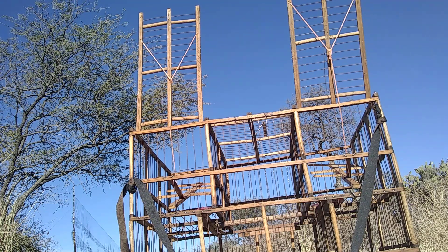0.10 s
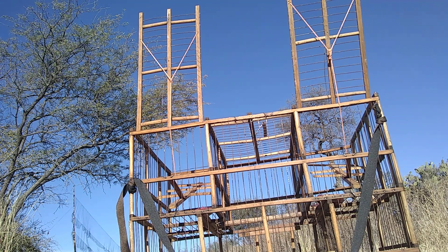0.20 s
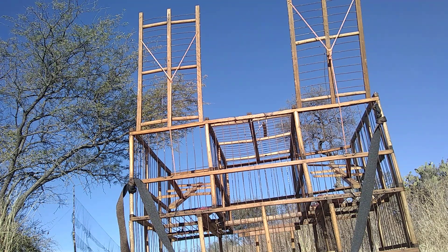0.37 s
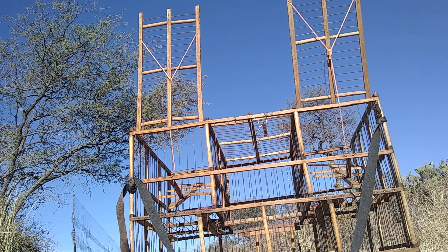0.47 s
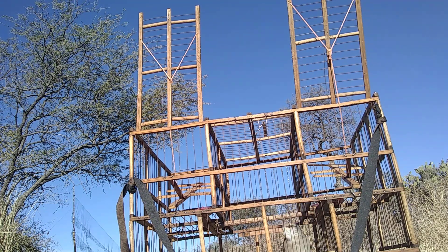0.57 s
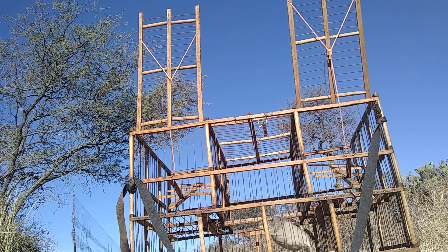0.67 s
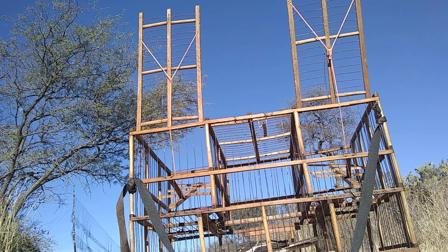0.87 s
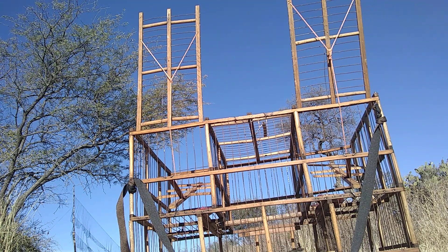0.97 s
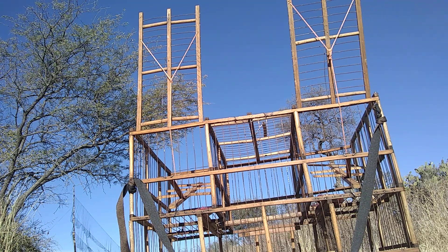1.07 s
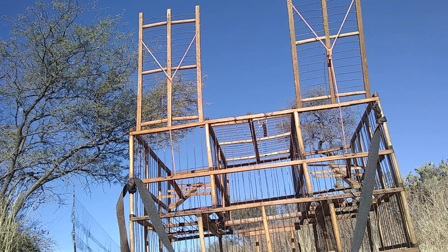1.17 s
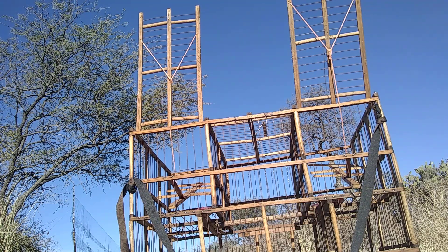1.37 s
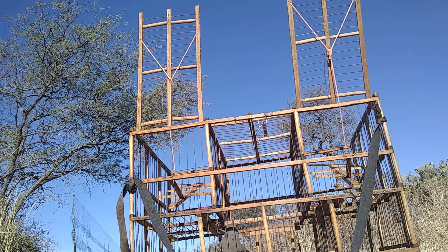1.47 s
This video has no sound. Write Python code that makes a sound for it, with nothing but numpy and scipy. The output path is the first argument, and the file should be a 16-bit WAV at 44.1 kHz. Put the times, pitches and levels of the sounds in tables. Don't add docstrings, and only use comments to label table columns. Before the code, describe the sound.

Songbird in a slatted cage outdoors: brief beating whistle, tiny gap, fast liquid trill dropping in pitch and slowing, repeated four times without pause. Clear and fairly dry, slight scattered echo, very quiet air hiss, drifting left to right.

```python
import sys
import numpy as np
from scipy import signal
from scipy.fft import rfft, irfft
from scipy.io import wavfile
from scipy.ndimage import uniform_filter1d, map_coordinates

SR = 44100
rng = np.random.default_rng(int(sys.argv[2]) if len(sys.argv) > 2 else 0)


def master_out(mix):
    frames = np.transpose(np.atleast_2d(mix))
    ceiling = np.clip(frames, -1, 1)
    pcm = np.round(ceiling * 32767).astype(np.int16)
    wavfile.write(sys.argv[1], SR, pcm)


def linear_from_db(decibels):
    return 10 ** (np.asarray(decibels, float) / 20)


N = 68355

# (start [s], length [s], level [dB], second voice [dB], share of the note that voice lasts [0-1])
WHISTLES = [
    (0.178, 0.062, -22, -9.5, 0.4),
    (0.444, 0.056, -17.5, -8, 1),
    (0.734, 0.064, -22.5, -3, 0.93),
    (1.061, 0.066, -23, -4.5, 0.58),
]
# (octave [dB], third harmonic [dB], late octave change [dB], opening puff [dB], closing puff [dB])
COLOURS = [
    (0, 7.5, -2, 4.5, -3.5),
    (0, 2, -3, 1.5, 5.5),
    (0, -2, 3, 0, -2),
    (3, -4, -8.5, -4.5, 1.5),
]


def evened(x):
    return x / np.sqrt(np.mean(x ** 2) + 1e-20)


def smooth_noise(size):
    return evened(uniform_filter1d(rng.standard_normal(N), size=size))


def coloured(points, count):
    f, db = np.transpose(points)
    shape = linear_from_db(np.interp(np.log(np.fft.rfftfreq(N, 1 / SR) + 1), np.log(f), db))
    return evened(irfft(rfft(rng.standard_normal((count, N))) * shape, N))


def eased(t, knots, values):
    place = np.interp(t, knots, np.arange(len(knots)))
    k = np.minimum(place.astype(int), len(knots) - 2)
    return values[k] + (values[k + 1] - values[k]) * (.5 - .5 * np.cos(np.pi * (place - k)))


def whistle(t, start, length, level_db, second_db, share, pitch, skew, colour):
    second_up_hz, voice_rough, octave_rough = 272, .1, .8
    octave_db, third_db, late_octave_db = colour[:3]
    u = np.clip((t - start) / length, 0, 1)
    spent = np.clip(u / share, 0, 1) ** 2
    swell = linear_from_db(level_db) * np.sin(np.pi * u ** skew).clip(0) ** 0.97
    second = linear_from_db(second_db) * np.sqrt(np.cos(np.pi / 2 * spent).clip(0))

    hz = uniform_filter1d(np.interp(t, *np.transpose(pitch)), size=300)
    drift = 1 + 0.061 * smooth_noise(500)
    rough = uniform_filter1d(rng.standard_normal((2, N)), size=50)
    hoarse, shaky = evened(uniform_filter1d(rough, size=40))
    low = 2 * np.pi * np.cumsum(hz) / SR
    beat = 2 * np.pi * np.cumsum(second_up_hz * drift) / SR

    tone = (1 + voice_rough * shaky) * np.cos(low)
    tone += linear_from_db(-36.5 + third_db) * np.cos(3 * low + hoarse)
    below, above = linear_from_db(-24.5) * np.cos(low - beat), linear_from_db(-14.5) * np.cos(low + 2 * beat)
    tone += second * (np.cos(low + beat) + below + above)

    octave = linear_from_db(-30 + 8.5 * spent) * np.cos(2 * low)
    octave += second * linear_from_db(-25.5) * (np.cos(2 * low + beat) + .5 * np.cos(2 * low + 2 * beat))
    octave *= linear_from_db(octave_db + late_octave_db * np.clip((u - .6) / .2, 0, 1))
    octave *= 1 + octave_rough * hoarse * second
    return swell * (tone + octave), swell


def whistles(t):
    # (time [s], frequency [Hz])
    whistle_hz = [
        [(.18, 1827), (.21, 1791), (.228, 1865), (.238, 1846)],
        [(.445, 1768), (.462, 1823), (.5, 1747)],
        [(.736, 1750), (.755, 1820), (.783, 1733), (.796, 1844)],
        [(1.062, 1754), (1.086, 1855), (1.104, 1761), (1.124, 1875)],
    ]
    skews = [
        1.2,
        1.11,
        0.83,
        0.95,
    ]
    rows = zip(WHISTLES, whistle_hz, skews, COLOURS)
    return np.sum([whistle(t, *row, *more) for row, *more in rows], 0)


def warble(t, notes, effort, lead_in):
    # (time [s], level [dB])
    octave_by_phrase = [
        (.3, 1.5),
        (.6, -2),
        (.9, -6.5),
        (1.22, 2),
    ]
    flick_s, break_s, end_s = .002, 0.0019, .004
    throat_hz, throat_width_hz, knee_hz = 2778, 740, 2645
    top_s, top_hz, low_hz, ahead_ms, slide_ms = np.transpose(notes)
    ahead, slide = ahead_ms * 1e-3, slide_ms * 1e-3
    level_db, break_db = np.transpose(effort)
    lead_s, lead_hz, lead_db = lead_in

    before = np.r_[low_hz[0], low_hz[:-1]]
    shoulder = before + (.72 + .016 * break_db.clip(0, 30)) * (top_hz - before)
    bend = top_hz - .4 * (top_hz - low_hz)
    flick = top_s - ahead
    begin, end = top_s[0] - lead_s, top_s[-1]
    times = np.c_[flick - flick_s, flick, top_s, top_s + slide / 2, top_s + slide]
    knots = np.r_[begin, times.ravel()]
    pitch = np.r_[lead_hz, np.c_[before, shoulder, top_hz, bend, low_hz].ravel()]
    hz = uniform_filter1d(np.interp(t, np.maximum.accumulate(knots), pitch), size=50)

    db = eased(t, np.r_[begin, top_s + .6 * slide], np.r_[lead_db, level_db])
    glide = uniform_filter1d(np.gradient(hz), size=60) * SR
    db -= 2 * np.tanh(glide / 170000.0)
    db -= 19.5 * (knee_hz - hz).clip(0) / 1e3
    hz = hz * (1 + .003 * smooth_noise(50))
    from_break = (t - (flick - flick_s / 2)[:, None]) / break_s
    db -= (break_db[:, None] * np.exp(-from_break ** 2)).sum(0)
    on = np.clip((t - begin) / end_s, 0, 1) * np.clip(1 - (t - end) / end_s, 0, 1)
    swell = on * linear_from_db(db - 5 * ((hz - throat_hz) / throat_width_hz) ** 2)

    beak_db = np.interp(t, *np.transpose(octave_by_phrase))
    octave = linear_from_db(-38 + beak_db - 14.5 * (hz - throat_hz) / 1e3)
    octave *= 1 + smooth_noise(60)
    turn = 2 * np.pi * np.cumsum(hz) / SR
    tone = np.cos(turn) + octave * np.cos(2 * turn) + linear_from_db(-53) * np.cos(3 * turn)
    return swell * tone, swell


def warbles(t):
    # (top [s], top [Hz], bottom after it [Hz], flick before the top [ms], slide after it [ms])
    warble_1 = [(.2495, 3120, 2830, 2, 3), (.2563, 3620, 2950, 2, 3.5), (.2646, 3760, 2830, 2.5, 6),
                (.2768, 3520, 2540, 3, 8), (.295, 3490, 2380, 5, 6.5), (.3164, 3320, 2400, 5, 6.5),
                (.3365, 2960, 2300, 4, 7), (.358, 2900, 2280, 4.5, 5.5), (.371, 2770, 2320, 3, 8),
                (.389, 2510, 2550, 5, 4), (.3955, 2560, 2560, 1, 2)]
    warble_2 = [(.511, 2880, 2840, 2, 3), (.517, 3500, 3050, 1.5, 3), (.523, 3680, 2970, 1.5, 4),
                (.5312, 3700, 2790, 2, 6), (.5425, 3490, 2520, 2, 9), (.5608, 3500, 2380, 3, 8),
                (.581, 3270, 2330, 4, 8), (.6006, 2960, 2300, 3, 6.5), (.621, 2810, 2230, 3, 6.5),
                (.639, 2700, 2270, 3.5, 6), (.654, 2860, 2500, 2.5, 7), (.664, 2490, 2490, 1, 2)]
    warble_3 = [(.81, 3170, 2740, 1.5, 3), (.8165, 3620, 2850, 1.2, 4), (.826, 3640, 2850, 2, 5),
                (.8365, 3570, 2550, 2, 7.5), (.8525, 3440, 2420, 2.5, 9), (.8725, 3240, 2420, 3.5, 9),
                (.892, 3170, 2300, 4, 9), (.9125, 3120, 2320, 3.5, 10), (.936, 2880, 2270, 4.5, 8),
                (.9565, 2750, 2300, 4.5, 6.5), (.97, 2980, 2350, 1.5, 10), (.9865, 2450, 2450, 2, 2)]
    warble_4 = [(1.1375, 3140, 2830, 1, 2.5), (1.1425, 3360, 2900, 1, 3), (1.149, 3620, 3020, 1, 4),
                (1.158, 3410, 2680, 2.5, 6.5), (1.1715, 3300, 2520, 3, 5.5), (1.189, 3340, 2420, 5, 7),
                (1.209, 3260, 2400, 6, 8), (1.2274, 2960, 2370, 3, 8), (1.247, 2900, 2300, 4, 10),
                (1.269, 2730, 2380, 3, 9), (1.287, 2660, 2300, 3, 10), (1.307, 2540, 2530, 5, 5),
                (1.315, 2520, 2520, 1, 2)]
    # (level [dB], break before it [dB])
    effort = [
        [(-35, 3), (-23, 3.5), (-13, -1.5), (-13, -1.5), (-13, 5.5), (-13, 7), (-15.5, 15.5), (-15.5, 14),
         (-24, 4), (-25.5, -2), (-37.5, 4)],
        [(-33.5, -1), (-29.5, 0.5), (-20.5, 2), (-13.5, -3.5), (-12, 1), (-16.5, 8), (-13, 13.5), (-16.5, 26),
         (-16.5, 32), (-19, 21), (-32, 3), (-26.5, 1)],
        [(-30.5, -1), (-30, 8), (-20, 3), (-16, 2.5), (-17, 5), (-17.5, 24), (-17.5, 25.5), (-19.5, 11.5),
         (-21, 25.5), (-16, 26.5), (-31, 12), (-28, -4)],
        [(-33, -2.5), (-28.5, -0.5), (-20.5, -7.5), (-17, -1), (-14.5, 5.5), (-15.5, 6), (-16.5, 5.5),
         (-19.5, 24), (-20.5, 6), (-19.5, 32.5), (-24, 0), (-25.5, 5), (-39, -2)],
    ]
    # (length [s], start [Hz], level [dB])
    lead_ins = [
        (.008, 2600, -58),
        (.018, 2250, -46),
        (.017, 2250, -46),
        (.013, 2450, -48),
    ]
    rows = zip((warble_1, warble_2, warble_3, warble_4), effort, lead_ins)
    return np.sum([warble(t, *row) for row in rows], 0)


def rasp(t, swell):
    # (frequency [Hz], density [dB per Hz])
    breath = [
        (600, -21.5),
        (1500, -8.5),
        (3000, 6.5),
        (4200, -29),
        (5500, -24.5),
        (12800, -28),
        (14000, -5),
        (14700, -24.5),
    ]
    # (time [s], level [dB])
    rasp_db = [
        (.2, -39.5),
        (.3, -20.5),
        (.47, -27),
        (.6, -19.5),
        (.77, -30.5),
        (.9, -22),
        (1.09, -28.5),
        (1.22, -27.5),
    ]
    same = 0.58
    *own, shared = coloured(breath, count=3)
    noise = same * np.array([shared, np.roll(shared, shift=1)]) + (1 - same) * np.array(own)
    follow = abs(uniform_filter1d(swell, size=200)) ** 0.87
    lumps = linear_from_db(4 * smooth_noise(300))
    return noise * follow * linear_from_db(np.interp(t, *np.transpose(rasp_db))) * lumps


def puffs(t):
    # (frequency [Hz], density [dB per Hz])
    puff = [
        (450, -34),
        (750, -4.5),
        (1300, -8.5),
        (2300, 8),
        (3000, -33.5),
    ]
    puff_s = 0.0048
    start, length = np.transpose(WHISTLES)[:2]
    edges = np.r_[start + puff_s, start + length - puff_s / 2]
    level = linear_from_db(-41.5 + np.transpose(COLOURS)[3:].reshape(-1, 1))
    bursts = level * np.exp(-((t - edges[:, None]) / puff_s) ** 2)
    return bursts.sum(0) * coloured(puff, count=1)


def at_ports(t, song):
    # (time [s], lead of the left port [microseconds], left over right [dB])
    bearing = [
        (.2, 75.5, -2.8),
        (0.399, 82, 1),
        (.53, 97, -2.5),
        (0.651, 71, 1),
        (0.76, 59, -0.5),
        (0.847, -5.5, 3.6),
        (0.979, -45, -1.7),
        (1.091, -21.5, 4.5),
        (1.17, -46, -2.2),
        (1.3, -67, 0),
    ]
    s, lead_us, tilt_db = np.transpose(bearing)
    half = np.interp(t, s, lead_us) * 1e-6 * SR / 2
    ports = np.array([map_coordinates(song, [np.arange(N) + k * half], order=3) for k in (1, -1)])
    side = np.array([[1], [-1]])
    return ports * linear_from_db(side * np.interp(t, s, tilt_db) / 2)


def echoes(x, t60):
    t = np.arange(SR // 4) / SR
    tail = rng.standard_normal((2, len(t))) * linear_from_db(-60 * t / t60) * np.minimum(t / 0.0056, 1)
    return signal.fftconvolve(x[None], tail / np.linalg.norm(tail[0]), axes=1)[:, :N]


def bird():
    t = np.arange(N) / SR
    song, swell = whistles(t) + warbles(t)
    cage = linear_from_db(-27) * echoes(song, t60=.03)
    scrub = linear_from_db(-25) * echoes(song, t60=0.069)
    return at_ports(t, song) + rasp(t, swell) + puffs(t) + cage + scrub


def air():
    # (frequency [Hz], density [dB per Hz])
    hiss = [(25, -28.5), (70, -1.5), (250, -0.5), (500, -7), (1200, -19.5), (3200, -19.5), (7000, -21.5),
            (14000, -28.5)]
    # (frequency [Hz], density [dB per Hz])
    far = [(60, -23.5), (150, -5), (400, 1.5), (800, -14), (1500, -22.5), (3000, -32)]
    return linear_from_db(-58) * coloured(hiss, count=2) + linear_from_db(-60) * coloured(far, count=1)


def thinned(x):
    mid_side = np.array([x[0] + x[1], x[0] - x[1]]) / 2
    hz, t, z = signal.stft(mid_side, SR, nperseg=1024, noverlap=768)
    power_db = 10 * np.log10((abs(z) ** 2).sum((0, 1)) + 1e-12)
    loud = np.clip((power_db + 39) / 10, .12, 1)
    bands = rng.standard_normal((len(t), 2, len(hz) // 10 + 1)).transpose(1, 2, 0)
    bands = evened(uniform_filter1d(bands, size=9, axis=2))
    bands = np.repeat(bands, repeats=10, axis=1)[:, :len(hz)]
    chance = .5 + .5 * np.tanh(.85 * bands)
    dropped = (chance < .3 * loud) & (hz[:, None] > 3200)
    z = z * np.where(dropped, linear_from_db(-26), 1)
    mid, side = signal.istft(z, SR, nperseg=1024, noverlap=768)[1][:, :N]
    return np.array([mid + side, mid - side])


def scene():
    return bird() + air()


def band_limit(x):
    return signal.sosfilt(signal.butter(12, 15280, fs=SR, output="sos"), x)


def record(dry):
    null_hz, top_hz, edge_hz = 2306, 6300, 14300
    share, low_share, low_hz = 0.64, 0.35, 494
    hz, z = np.fft.rfftfreq(N, 1 / SR), rfft(dry)
    part = share - (share - low_share) / (1 + (hz / low_hz) ** 2)
    cross = part * np.exp(-2j * np.pi * hz / null_hz) / (1 + (hz / top_hz) ** 8)
    steered = irfft((z - cross * z[::-1]) / (1 + (hz / edge_hz) ** 100), N)
    mix = thinned(steered)
    return band_limit(mix)


dry = scene()
out = record(dry)
master_out(out)
```